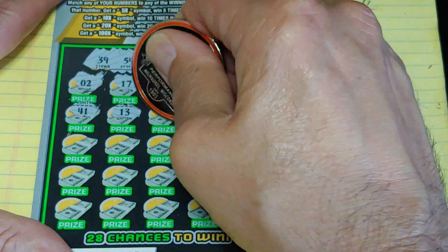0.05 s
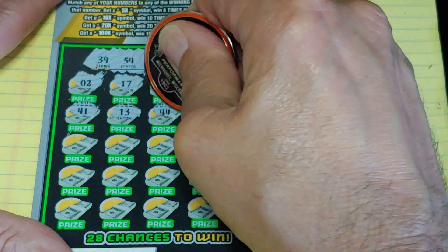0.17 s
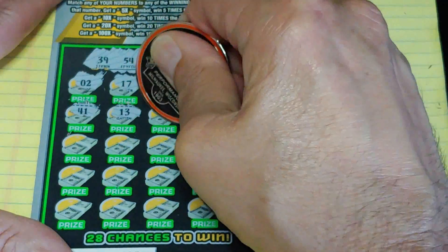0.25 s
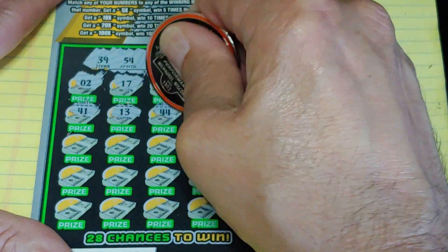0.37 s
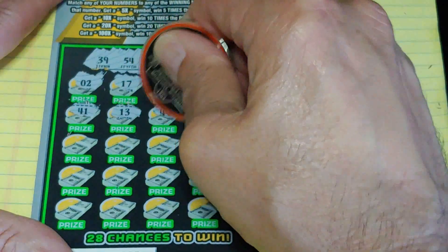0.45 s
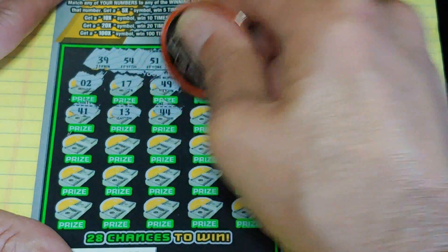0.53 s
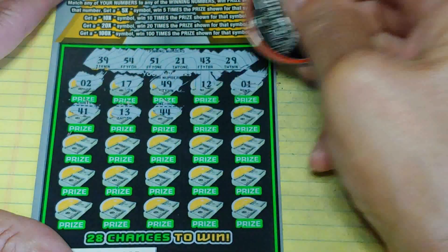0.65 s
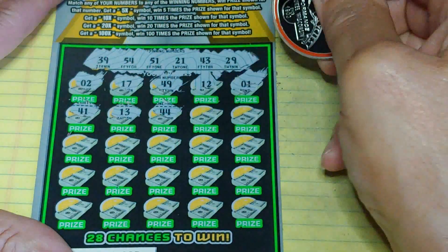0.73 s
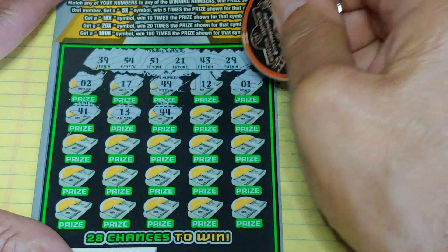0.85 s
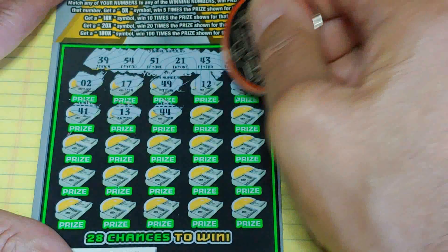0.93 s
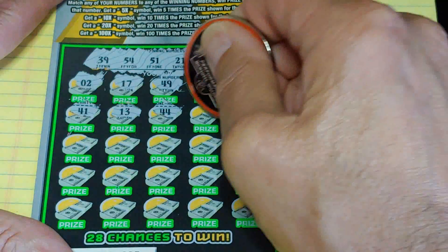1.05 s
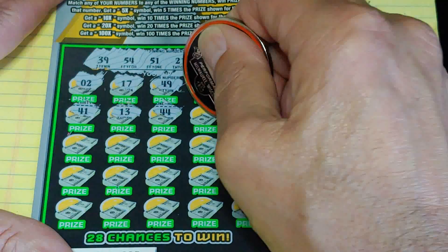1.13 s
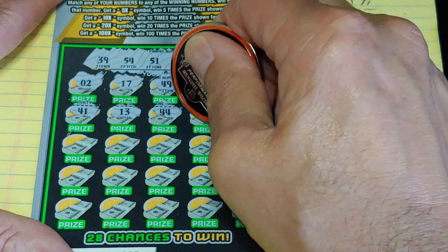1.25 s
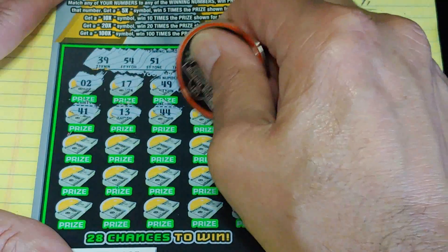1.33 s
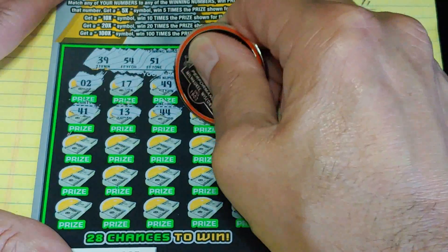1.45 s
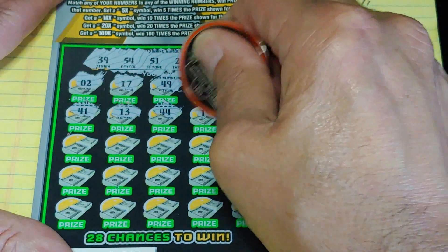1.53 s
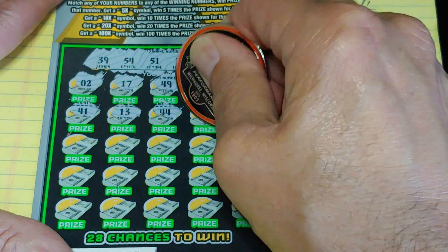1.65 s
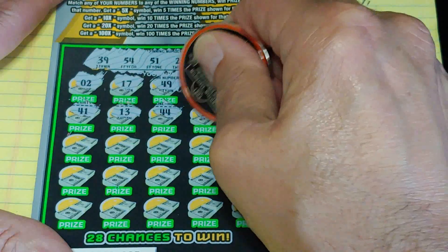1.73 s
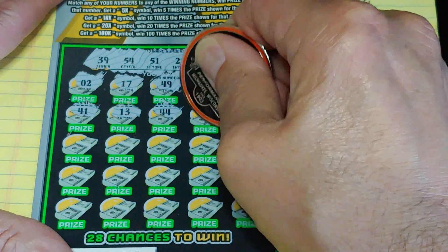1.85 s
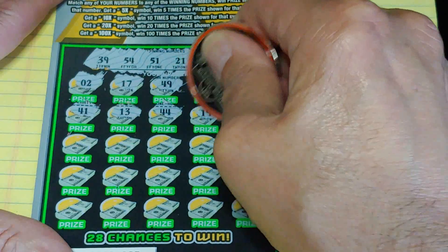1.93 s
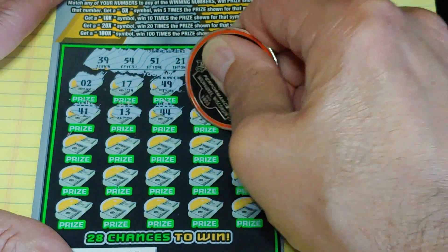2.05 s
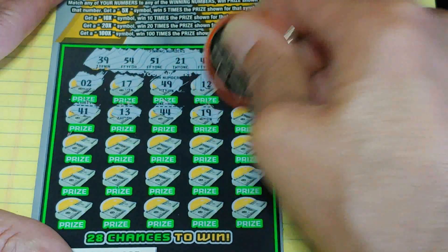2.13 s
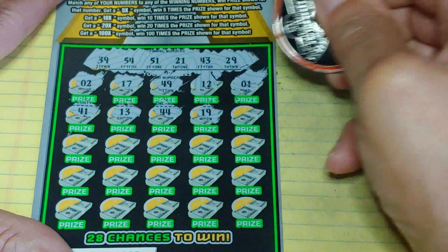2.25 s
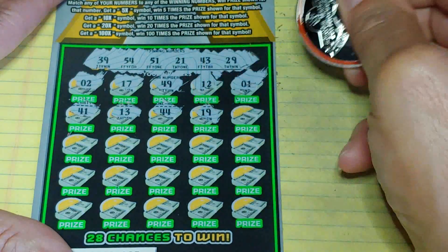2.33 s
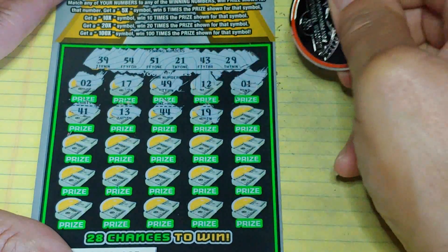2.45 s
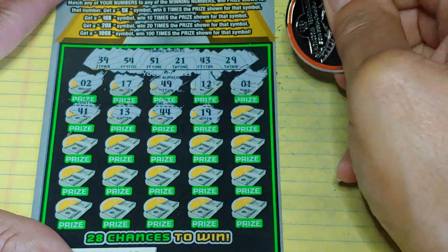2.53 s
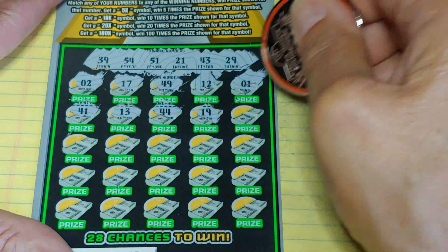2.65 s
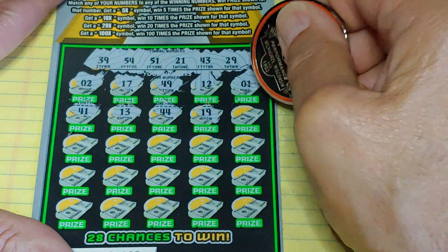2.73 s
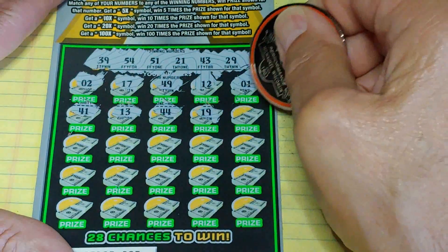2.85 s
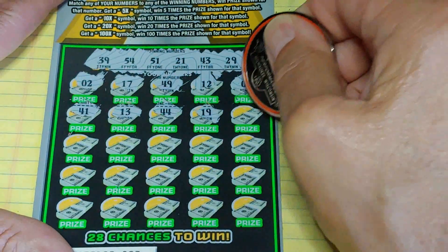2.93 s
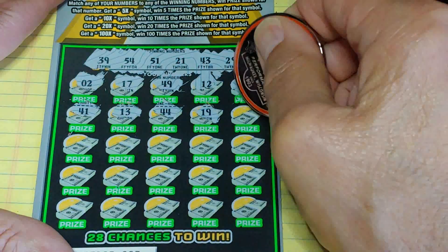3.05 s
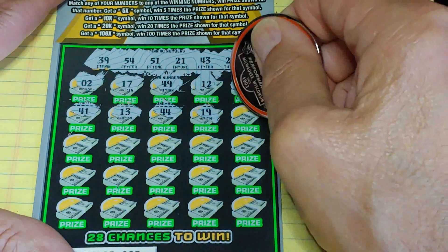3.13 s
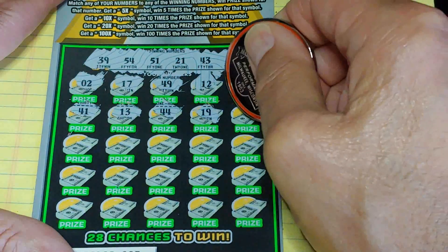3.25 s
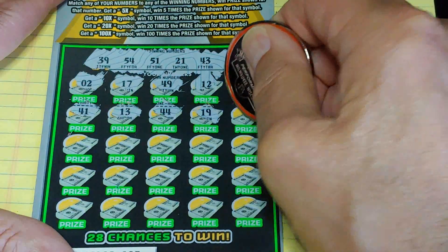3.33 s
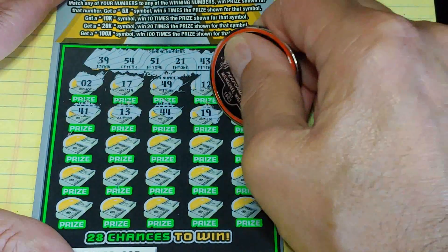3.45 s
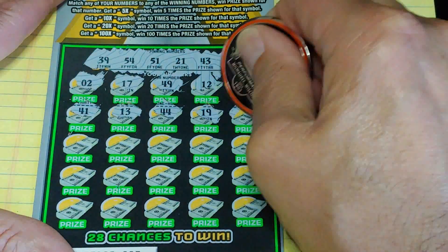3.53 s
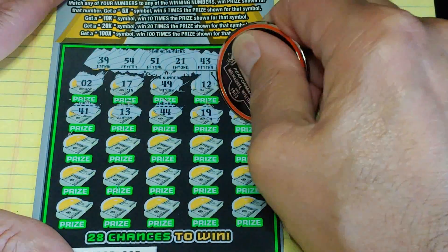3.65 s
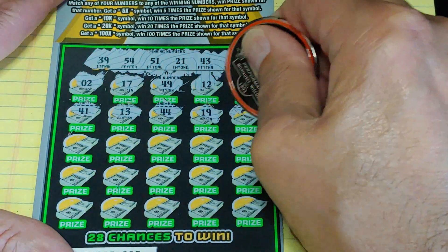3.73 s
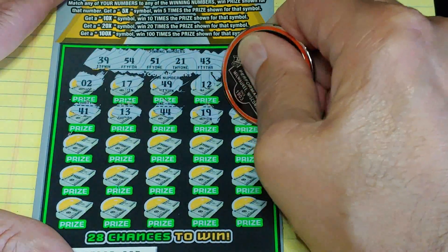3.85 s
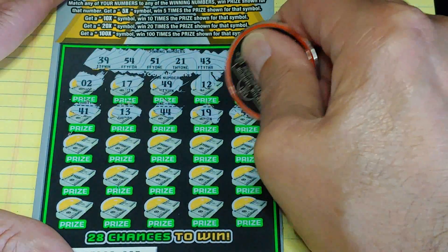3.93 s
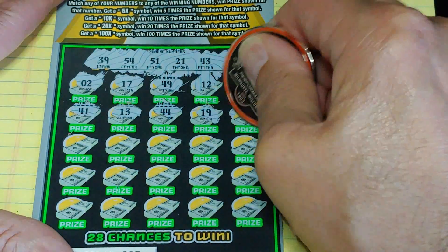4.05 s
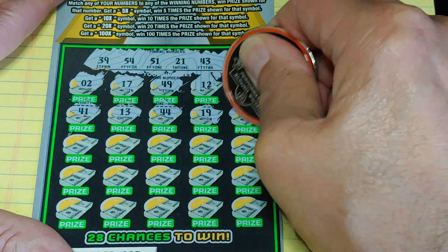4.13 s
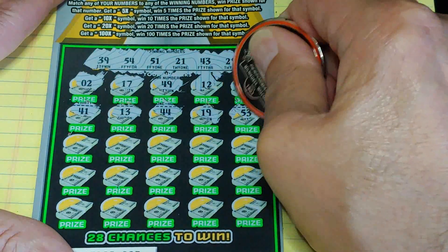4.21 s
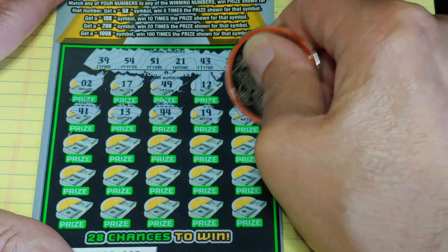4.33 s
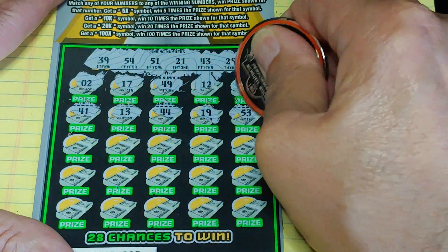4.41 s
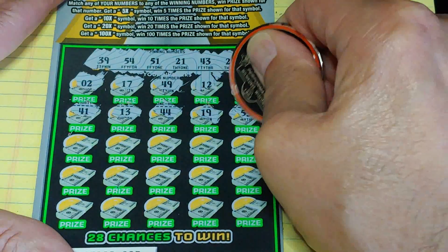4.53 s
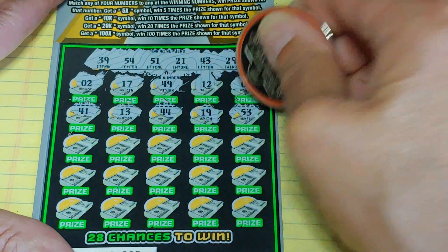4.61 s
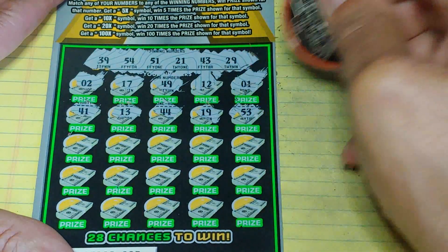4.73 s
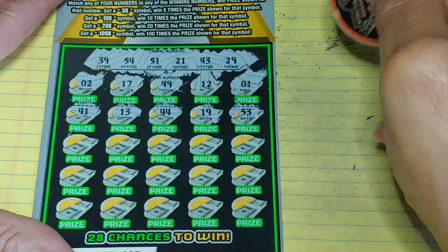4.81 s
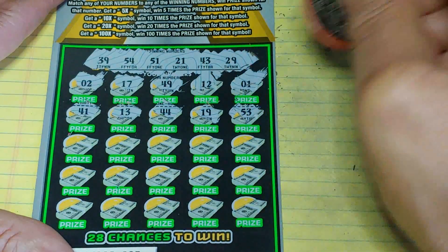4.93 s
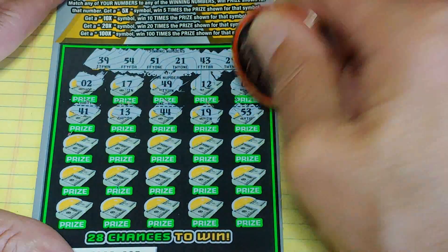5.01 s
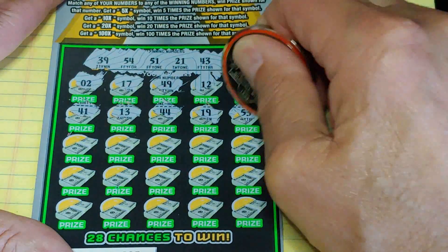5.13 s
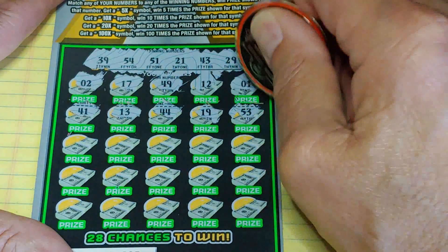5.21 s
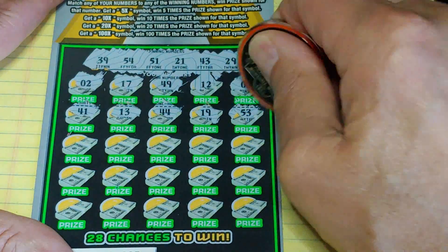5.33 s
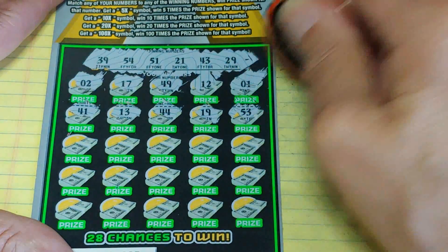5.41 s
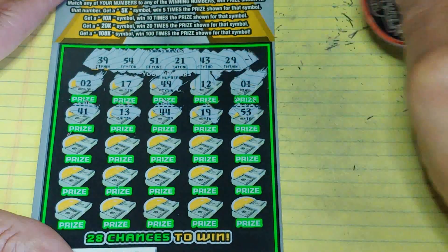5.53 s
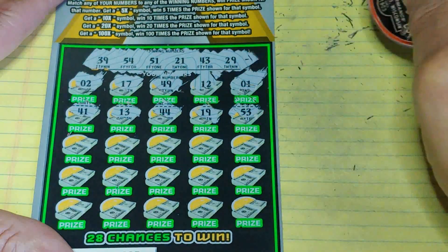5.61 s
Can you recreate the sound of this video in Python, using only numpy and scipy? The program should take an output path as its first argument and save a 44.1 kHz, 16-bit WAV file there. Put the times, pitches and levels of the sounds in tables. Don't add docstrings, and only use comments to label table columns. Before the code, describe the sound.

A small, quiet room heard by a two-port phone close to a wooden table, with faint airy rumble and a weak, wavering low hum far off. From 0 to 0.55 s a coin rim scrapes a card ticket in six fast strokes, roughly ten a second: dry, gritty, with a small midrange rattle and low table thumps. Skin brushes softly over paper around 0.65 s. A light tick at 1.12 s leads to ten strokes from 1.2 to 2.1 s, then faint sliding near 2.3 s and near silence. After a tiny tick at 3.33 s, twelve strokes run from 3.4 to 4.6 s, gritty, somewhat softer in scrape, with prominent woody shaking. The rim drags off with a low bump at about 4.67 s. Two hollow knocks, by far the loudest events, strike at 5.06 and 5.28 s with short woody ringing and a papery crack; faint rustle ends it near 5.6 s.

```python
import sys
import numpy as np
from scipy import signal
from scipy.fft import rfft, irfft
from scipy.io import wavfile
from scipy.ndimage import uniform_filter1d

SR = 44100
rng = np.random.default_rng(int(sys.argv[2]) if len(sys.argv) > 2 else 0)


def transcribe(u):
    v = np.clip(np.atleast_2d(u).T, -1, 1)
    q = np.round(v * 32767).astype(np.int16)
    wavfile.write(sys.argv[1], SR, q)


def voltage_ratio(decibels):
    exponent = np.asarray(decibels, float) / 20
    return 10 ** exponent


N = 250047
T = np.arange(N) / SR
F = np.fft.rfftfreq(N, 1 / SR)
STROKE_SAMPLES, LEAD_S = 9000, 0.08

# full_speed_s, rise_s, scrape_db, shake_minus_scrape_db
STROKES = [(0.038, 0.031, -39.5, 8), (0.133, 0.028, -38, 2.5), (0.223, 0.023, -35.5, 1),
           (0.337, 0.032, -39, 8.5), (0.42, 0.035, -36, 11.5), (0.503, 0.034, -33.5, -7.5),
           (1.234, 0.024, -46, 1.5), (1.351, 0.024, -38.5, 1.5), (1.454, 0.026, -37.5, 0.5),
           (1.554, 0.03, -37.5, 2), (1.66, 0.029, -41.5, 8), (1.769, 0.035, -43, 4.5),
           (1.854, 0.025, -36.5, 3.5), (1.949, 0.032, -36.5, -1.5), (2.031, 0.019, -36, 1.3),
           (2.101, 0.023, -36.5, -12), (3.412, 0.022, -39, -3.5), (3.524, 0.031, -36.5, -1),
           (3.619, 0.017, -44, 7.5), (3.722, 0.023, -40, 8), (3.853, 0.049, -42, 4),
           (3.943, 0.022, -44, 12), (4.066, 0.03, -41, 3), (4.17, 0.031, -40, 7),
           (4.265, 0.024, -39.5, 6.5), (4.365, 0.033, -41, 11), (4.453, 0.03, -50.5, 19.5),
           (4.568, 0.034, -46, 11)]
# pitch_hz, width_hz, level_db
COIN_MODES = [(862, 39, -5.5), (1632, 90, -3.5), (1900, 170, -13), (1985, 51, 7), (2700, 340, 7),
              (3060, 37, -4), (3450, 48, -3), (4520, 120, -6), (4800, 90, -37), (5295, 150, -13),
              (5550, 120, -36), (6060, 34, -33)]


def unit(x):
    return x / np.sqrt(np.mean(x ** 2))


def colour(x, points):
    hz, db = np.transpose(points)
    gain = unit(voltage_ratio(np.interp(np.log(F + 1), np.log(hz), db)))
    cepstrum = irfft(np.log(gain), N)
    cepstrum[1:N // 2] *= 2
    cepstrum[N // 2:] = 0
    return irfft(rfft(x) * np.exp(rfft(cepstrum)), N)


def grains(scatter_db, rate):
    slips = (rng.random(N) < rate / SR) * rng.standard_normal(N)
    return unit(slips * voltage_ratio(scatter_db * np.minimum(rng.exponential(size=N), 4)))


def walk(rate):
    hold = int(SR / rate)
    levels = np.repeat(rng.standard_normal(N // hold + 1), hold)
    slewed = uniform_filter1d(uniform_filter1d(levels, hold), hold)
    return unit(slewed[:N])


def swells(s, reach_s, db, shape, onset=1):
    total = 0
    for peak_s, reach, level_db in np.broadcast(s, reach_s, db):
        distance = np.abs((T - peak_s) / (reach * np.where(T < peak_s, onset, 1)))
        total = total + voltage_ratio(level_db - 12.9 * distance ** shape)
    return total


def ring(hz, t60, length=0.5):
    t = np.arange(int(length * SR)) / SR
    return np.sin(2 * np.pi * hz * t) * np.exp(-np.log(1000) * t / t60)


def add(out, s, sound):
    i = int(s * SR)
    out[i:i + len(sound)] += sound[:len(out) - i]


def room_tone():
    # pitch_hz, density_db (per Hz)
    room_curve = [(12, -29.5), (20, 1), (71, -2), (118, -11), (143, -5.5), (173, -23), (252, -14.5), (580, -27),
                  (739, -30), (4370, -34.5), (6040, -44.5), (8350, -39.5), (12500, -40), (16200, -72.5),
           (22000, -120)]
    mid, side = (colour(noise, room_curve) for noise in rng.standard_normal((2, N)))
    apart = np.clip(F / 700, 0.1, 1) * np.clip(3000 / (F + 1), 0.3, 1)
    side = irfft(rfft(side) * apart, N)
    swell = voltage_ratio(walk(rate=3))
    flutter = voltage_ratio(2.5 * walk(rate=9))
    hum_hz = 117.2 + 1.5 * walk(rate=1.9)
    hum = flutter * np.sin(2 * np.pi * np.cumsum(hum_hz) / SR)
    return voltage_ratio(-78 + 11) * swell * (mid + side * np.array([[1], [-1]])) + voltage_ratio(-65) * hum


def stroke_gain(extra_db, lag_s, stretch, start_db, rise_shape, fall_shape):
    s, rise, db = np.transpose(STROKES)[:3, :, None]
    contact_s, shortest_fall_s = 0.048, 0.011
    fall = np.maximum(contact_s - rise, shortest_fall_s)
    t = T[:STROKE_SAMPLES] - LEAD_S - lag_s
    before = np.maximum(-t, 0) / (stretch * rise)
    bite = np.clip((1 - before) * stretch * rise / 0.0034, 0, 1)
    after = (np.maximum(t, 0) / (stretch * fall)) ** fall_shape
    return bite * voltage_ratio(db + extra_db + start_db * before ** rise_shape - 17.9 * after)


def coin(grip):
    ring_time = np.log(1000) / np.pi
    modes = 0
    for (hz, width, db), (louder, sharper) in zip(COIN_MODES, grip):
        mode = ring(hz * (1 + 0.02 * sharper), ring_time / width, 0.06)
        modes = modes + voltage_ratio(db + 3 * louder) * np.sqrt(width) * mode
    return modes / np.sqrt(np.sum(modes ** 2))


def scratching():
    # pitch_hz, density_db (per Hz)
    scrape_curve = [(500, -48), (900, -16), (1300, -15), (2000, 3), (2400, -7), (4000, -10.5),
                    (5000, -20.5), (7000, -88.5)]
    # pitch_hz, density_db (per Hz)
    grit_curve = [(2500, -23), (4500, 13.5), (5600, 7), (7000, -4), (8200, -10.5), (11000, -23.5),
                  (13000, -30.5)]
    # pitch_hz, density_db (per Hz)
    shake_curve = [(80, -42.5), (200, -2), (350, 3.5), (520, 0), (750, -9.5), (1000, -6), (1300, -48.5)]
    slips, coarse = grains(scatter_db=1, rate=5000), grains(scatter_db=2.5, rate=700)
    slips = slips * voltage_ratio(0.99 * walk(rate=150))
    grips = rng.standard_normal((len(STROKES), len(COIN_MODES), 2))
    full_speed_s, shake_db = np.array(STROKES)[:, :1], np.array(STROKES)[:, 3:]
    grit_db = -7 - 0.5 * shake_db + 0.62 * full_speed_s
    speed = stroke_gain(extra_db=0.5, lag_s=0, stretch=1.156, start_db=-13.5,
                        rise_shape=2.06, fall_shape=2.0)
    fast = stroke_gain(extra_db=grit_db, lag_s=0, stretch=1.41, start_db=-26,
                       rise_shape=0.87, fall_shape=1.07)
    press = stroke_gain(extra_db=shake_db, lag_s=0.013, stretch=1.785, start_db=-17.5,
                        rise_shape=1.72, fall_shape=0.82)
    rattle, scrape, grit, push = np.zeros((4, N + STROKE_SAMPLES))
    for k, row in enumerate(STROKES):
        s = row[0]
        i = k * STROKE_SAMPLES % (N - STROKE_SAMPLES)
        piece = slice(i, i + STROKE_SAMPLES)
        rubbed = slips[piece] * speed[k]
        add(rattle, s, signal.fftconvolve(rubbed, coin(grips[k]))[:STROKE_SAMPLES])
        add(scrape, s, rubbed)
        add(grit, s, slips[piece] * fast[k])
        add(push, s, coarse[piece] * press[k])
    lead = slice(int(LEAD_S * SR), int(LEAD_S * SR) + N)
    rim = voltage_ratio(-6.5) * rattle[lead] + voltage_ratio(-2.5) * colour(scrape[lead], scrape_curve)
    return rim + voltage_ratio(-2.5) * colour(grit[lead], grit_curve) + voltage_ratio(-5) * colour(push[lead], shake_curve)


def leaning():
    # peak_s, level_db
    leans = [(0.01, -42), (0.25, -37.5), (0.432, -37.5), (0.67, -47), (1.252, -36), (1.39, -41.5),
             (1.5, -36.5), (1.666, -35.5), (1.77, -41.5), (1.864, -40), (2.02, -42), (2.33, -63.5),
             (3.374, -41.5), (3.48, -50), (3.63, -42.5), (3.73, -47), (3.864, -36), (4.08, -37),
             (4.19, -39.5), (4.29, -34.5), (4.39, -39), (4.464, -42.5), (4.578, -48), (4.67, -54),
             (5.48, -52.5), (5.54, -53), (5.59, -58)]
    # pitch_hz, density_db (per Hz)
    rock_curve = [(30, -20.5), (80, -17), (118, 4.5), (140, -17), (210, 5), (260, -12), (400, -50)]
    lean_s, lean_db = np.transpose(leans)
    weight = swells(lean_s, 0.067, lean_db, shape=1.5, onset=0.81)
    weight += swells([5.047, 5.25], 0.01, [-42, -30], shape=2.3)
    return voltage_ratio(-3.0) * colour(grains(scatter_db=3.0, rate=1300) * weight, rock_curve)


def jolts():
    # start_s, peak_db, pitch_hz
    catches = [(0.11, -30, 800), (0.2, -27.5, 301), (0.334, -24.5, 217), (0.39, -20.5, 383),
               (0.426, -24.5, 219), (1.219, -28.5, 291), (1.35, -29.5, 425), (1.495, -26.5, 194),
               (1.543, -39, 490), (1.641, -24, 467), (1.85, -24, 369), (1.956, -28.5, 210),
               (2.021, -27.5, 404), (2.298, -38.5, 169), (3.388, -36.5, 289), (3.427, -30, 328),
               (3.54, -31, 387), (3.603, -30.5, 357), (3.721, -27, 569), (3.819, -27, 353.4),
               (3.951, -37, 360), (4.033, -25.5, 362), (4.063, -26, 288), (4.162, -41, 207),
               (4.24, -27.5, 353), (4.361, -27.5, 307), (4.44, -27.5, 118), (4.559, -28.5, 118)]
    out = np.zeros(N)
    for s, db, hz in catches:
        t60 = 0.14 * (hz / 300) ** -0.55
        add(out, s, voltage_ratio(db - 6.5) * ring(hz, t60, 0.2))
    return out


def sliding():
    # peak_s, reach_s, hiss_db, rub_minus_hiss_db
    slides = [(0.535, 0.037, -63, 0.5), (0.646, 0.078, -51.5, -7), (1.0, 0.11, -69.5, -7),
              (2.13, 0.04, -65.5, -2), (2.269, 0.099, -63.5, -3), (2.596, 0.047, -70.5, -14),
              (3.043, 0.062, -77.5, -6), (4.6, 0.012, -74, 21), (4.68, 0.07, -65, 1.5),
              (5.035, .013, -62.5, 0.5), (5.258, 0.037, -63, -5.5), (5.285, 0.029, -48.5, 9),
              (5.341, 0.073, -69.5, 5.5), (5.5, .07, -83, 7.5), (5.571, .03, -80, 9),
              (0.82, 0.043, -76.5, -2.5)]
    # pitch_hz, density_db (per Hz)
    hiss_curve = [(1500, -32.5), (2500, -9), (4400, -3.5), (6200, -17), (8000, -15), (11500, -14.5),
                  (13000, -40.5)]
    # pitch_hz, density_db (per Hz)
    rub_curve = [(300, 13.5), (600, 6.5), (1200, 4.5), (2000, 7.5), (2800, -43.5)]
    skin = grains(scatter_db=4.0, rate=24000)
    s, reach, db, rub_db = np.transpose(slides)
    hiss = colour(skin * swells(s, reach, db, shape=2.7), hiss_curve)
    return hiss + colour(skin * swells(s, reach, db + rub_db, shape=2.7), rub_curve)


def ticks():
    # start_s, peak_db, pitch_hz
    touches = [
        (1.1244, -37.5, 3300),
        (2.325, -53.5, 1930),
        (3.3334, -48, 2150),
        (5.0208, -50.5, 1584),
        (5.5586, -61, 1900),
    ]
    # pitch_hz, density_db (per Hz)
    crush_curve = [(300, -31.5), (700, -19), (2000, -3), (3300, 6), (4300, -6.5), (5300, -4.5), (6800, -28),
                   (12000, -22.5)]
    rings, crushed = np.zeros((2, N))
    t = T[:1500]
    for s, db, hz in touches:
        burst = rng.standard_normal(1500) * np.minimum(t / 0.001, 1) * np.exp(-t / 0.003)
        add(crushed, s - 0.001, voltage_ratio(db + 2.0) * burst)
        add(rings, s, voltage_ratio(db - 23.0) * signal.fftconvolve(burst, ring(hz, 0.008, 0.02)))
    return rings + colour(crushed, crush_curve)


def dragging():
    # pitch_hz, density_db (per Hz)
    drag_curve = [(250, -30), (420, 15.5), (700, -10.5), (1550, 5), (2100, 6), (2600, -6.5), (3300, 4),
                  (4500, -40)]
    pressure = voltage_ratio(-51.0 - 13 * ((T - 4.68) / 0.066) ** 2)
    drag = colour(grains(scatter_db=1.0, rate=3100) * pressure, drag_curve)
    add(drag, 4.652, voltage_ratio(-34.5) * ring(105.6, 0.13))
    return drag


def knocks():
    # start_s, blow_db, dent_hz, thud_db, crack_db
    blows = [
        (5.064, -1, 317, -22.5, -27.5),
        (5.261, -22.5, 298.5, -36.5, -61.5),
        (5.2755, 0, 312.6, -20, -34.5),
    ]
    # pitch_hz, level_db, t60_s
    table_modes = [(118, 3, 0.17), (211.3, 5.5, 0.24), (298, -7.5, 0.24), (403, -25, 0.32),
                   (490, -28, 0.63), (545, -12, 0.21), (664, -21.5, 0.17), (894, -33.5, 0.22),
                   (915, -44, 0.19), (1090, -47, 0.17), (1120, -39, 0.18), (1378, -32.5, 0.42)]
    # pitch_hz, level_db, t60_s
    spot_modes = [(703, -10, 0.039), (954, -12.5, 0.049), (1175, -30, 0.044), (804, -15, 0.034),
                  (172, -22.5, 0.27)]
    # pitch_hz, density_db (per Hz)
    thud_curve = [(90, -31.5), (160, -10), (420, 9), (700, 1), (1150, -8.5), (1450, -29), (2100, -25),
                  (5000, -38.5)]
    # pitch_hz, density_db (per Hz)
    crack_curve = [(500, -41.5), (1100, -5), (1500, -16.5), (2050, 4.5), (3200, 2.5), (6000, -15.5),
                   (8500, -15.5), (12000, -29)]
    out, thud, crack = np.zeros((3, N))
    modes = sum(voltage_ratio(db) * ring(hz, min(t60, 0.21)) for hz, db, t60 in table_modes)
    spot = sum(voltage_ratio(db) * ring(hz, t60) for hz, db, t60 in spot_modes)
    t = T[:len(modes)]
    for s, db, hz, thud_db, crack_db in blows:
        turns = (T - s) * hz
        swing = np.exp(-(turns / np.where(turns < 0, 0.6, 0.8)) ** 4)
        out += voltage_ratio(db) * np.cos(2 * np.pi * turns) * swing
        add(out, s + 0.0035, voltage_ratio(db - 15) * modes * np.minimum(t / 0.011, 1))
        add(out, s - 0.002, -voltage_ratio(db) * spot * np.minimum(t / 0.0014, 1))
        after = np.maximum(T - s, 0)
        thud += np.minimum(after / 0.004, 1) * voltage_ratio(thud_db) * np.exp(-after / 0.026)
        snap = np.exp(-after / 0.002) + 0.06 * np.exp(-after / 0.009)
        crack += (T > s - 0.004) * voltage_ratio(crack_db) * snap
    thud += swells(5.264, 0.0069, -34, shape=2)
    thud = colour(thud * rng.standard_normal(N), thud_curve)
    return out + thud + colour(crack * rng.standard_normal(N), crack_curve)


def echo(x, t60, db, low_hz, top_hz):
    t = T[:SR // 3]
    tail = rng.standard_normal((2, len(t))) * np.exp(-np.log(1000) * t / t60)
    tail = tail / np.sqrt(np.sum(tail ** 2, axis=1, keepdims=True))
    band = signal.butter(2, [low_hz, top_hz], "band", fs=SR, output="sos")
    tail = signal.sosfilt(band, tail)
    return voltage_ratio(db) * signal.fftconvolve(x[None], tail, axes=1)[:, :N]


def ports(x):
    lag = np.minimum(F * 0.00015, 1.2)
    late = irfft(rfft(x) * np.exp(-2j * np.pi * lag), N)
    pose = 2.61 * walk(rate=13)
    near = 0
    for k in range(3):
        facing = x * np.cos(pose + 2 * np.pi * k / 3)
        near = near + echo(facing, t60=0.03, db=-4.5, low_hz=450, top_hz=8000)
    room = echo(x, t60=0.16, db=-8, low_hz=400, top_hz=4200)
    return np.array([voltage_ratio(-1.04) * x, voltage_ratio(-2.3) * late]) + near + room


def scene():
    near = scratching() + leaning() + jolts() + sliding() + ticks() + dragging() + knocks()
    near = signal.sosfilt(signal.butter(2, 70, "high", fs=SR, output="sos"), near)
    near = signal.sosfilt(signal.butter(4, 11600, fs=SR, output="sos"), near)
    return ports(near) + room_tone()


def band_limit(x):
    return signal.sosfilt(signal.butter(12, 13070, fs=SR, output="sos"), x)


def record(dry):
    ceiling, top_hz = 0.92, 12150
    rounded = dry / (1 + np.abs(dry / ceiling) ** 6) ** (1 / 6)
    top = signal.ellip(8, 0.2, 60, top_hz, fs=SR, output="sos")
    return band_limit(signal.sosfilt(top, rounded))


dry = scene()
out = record(dry)
transcribe(out)
```